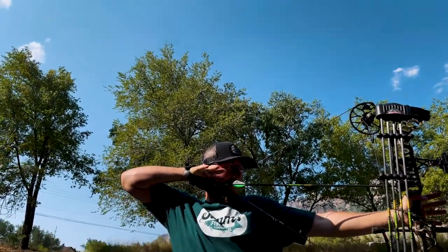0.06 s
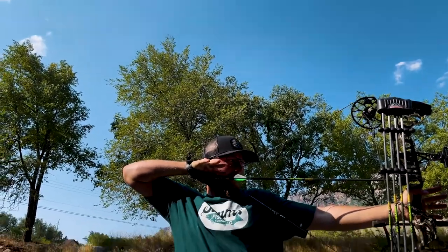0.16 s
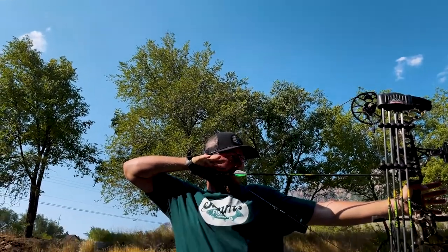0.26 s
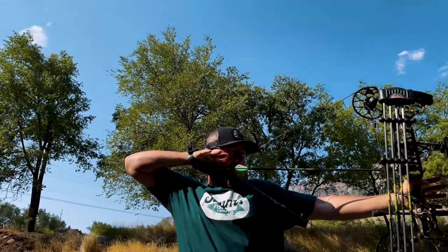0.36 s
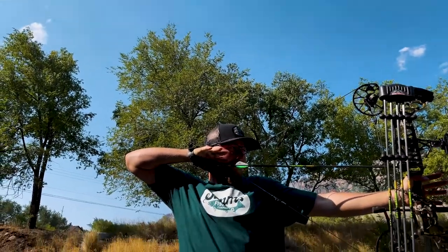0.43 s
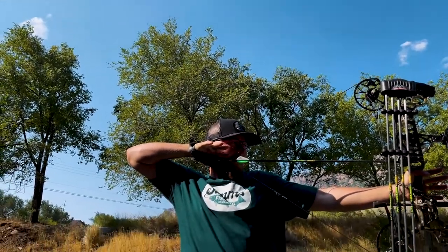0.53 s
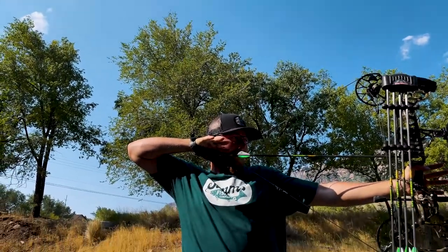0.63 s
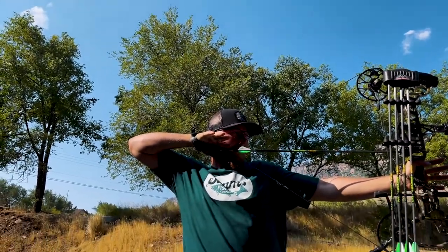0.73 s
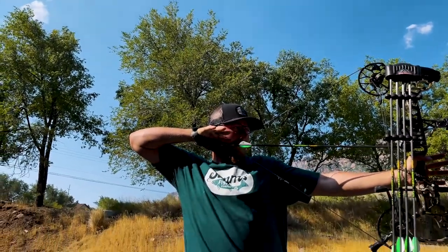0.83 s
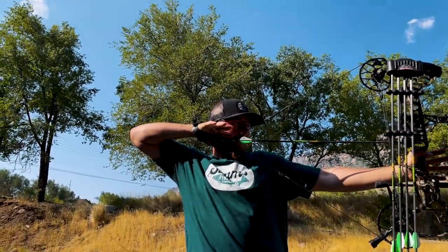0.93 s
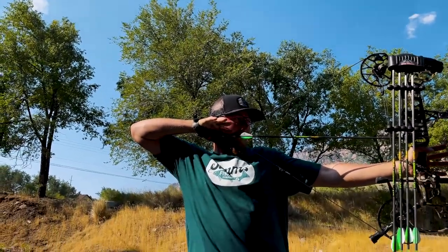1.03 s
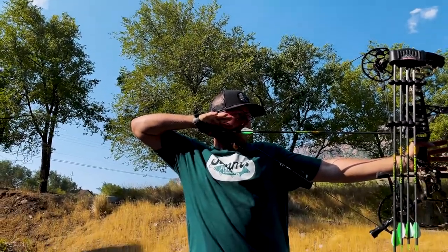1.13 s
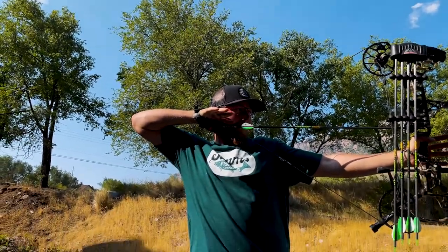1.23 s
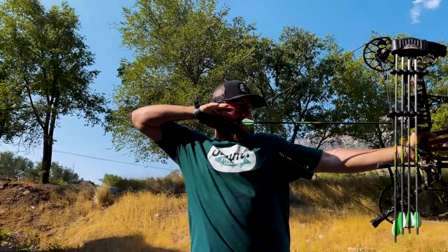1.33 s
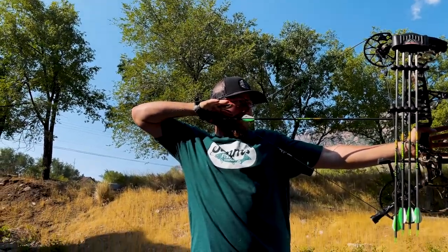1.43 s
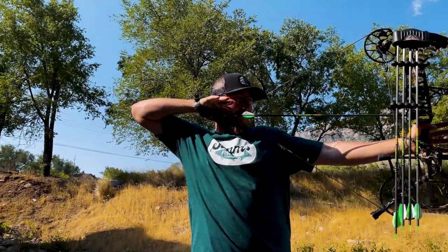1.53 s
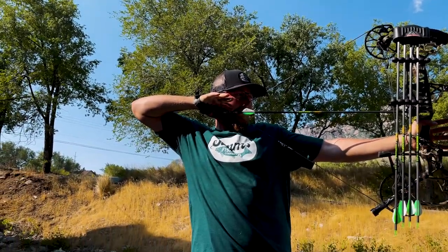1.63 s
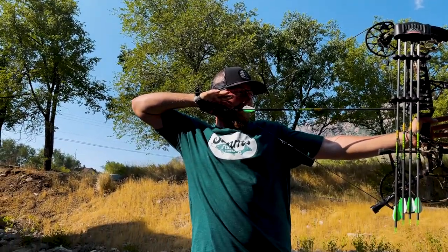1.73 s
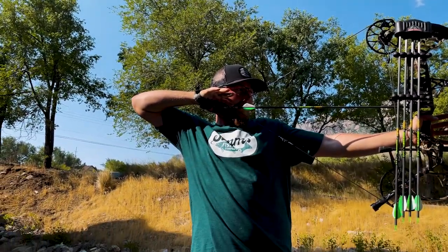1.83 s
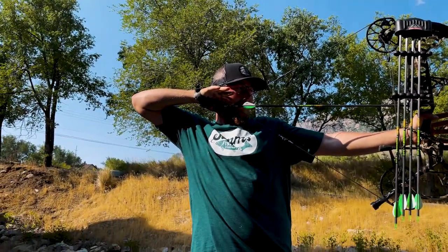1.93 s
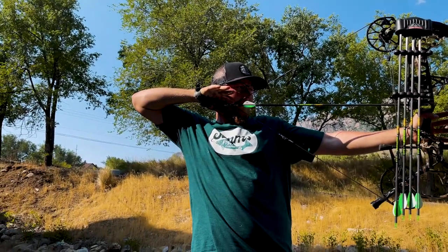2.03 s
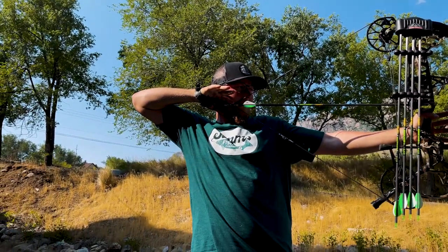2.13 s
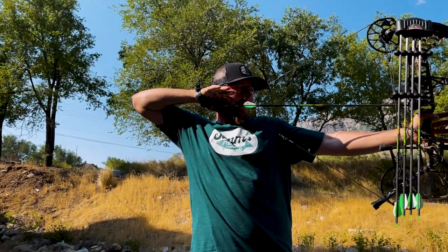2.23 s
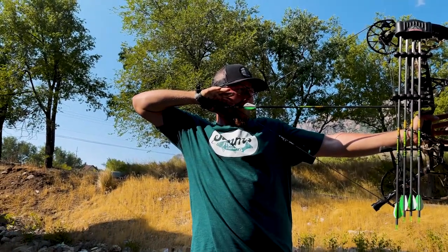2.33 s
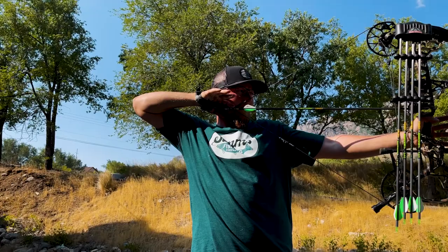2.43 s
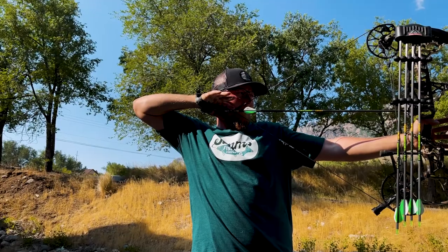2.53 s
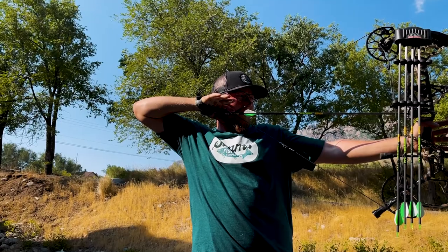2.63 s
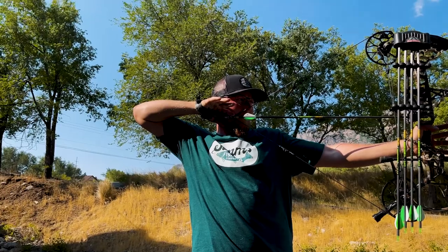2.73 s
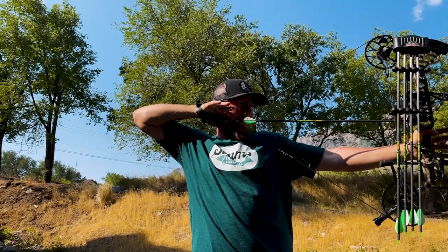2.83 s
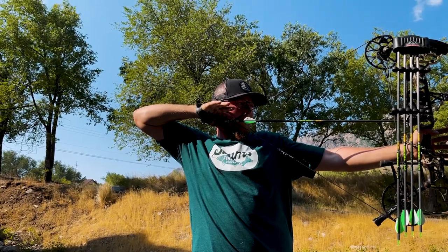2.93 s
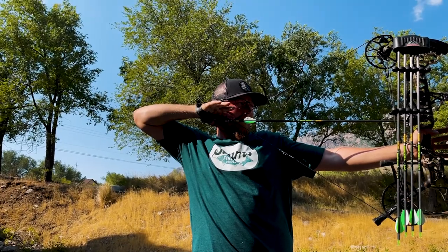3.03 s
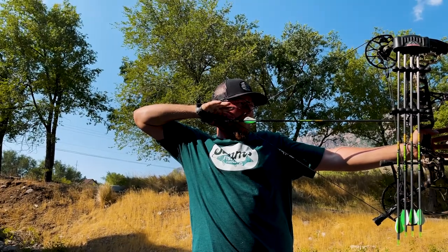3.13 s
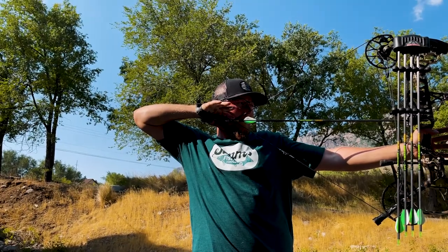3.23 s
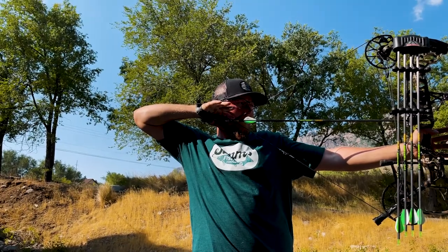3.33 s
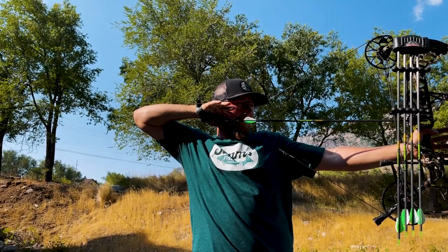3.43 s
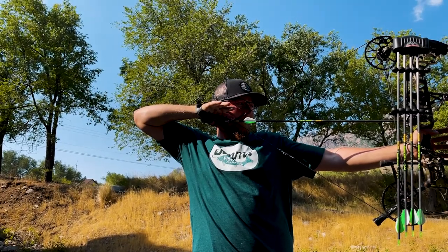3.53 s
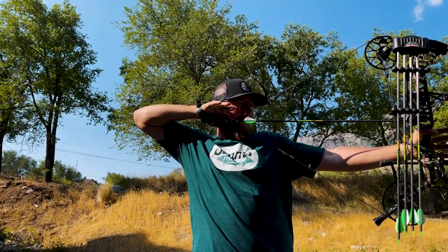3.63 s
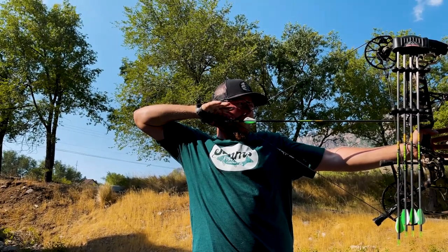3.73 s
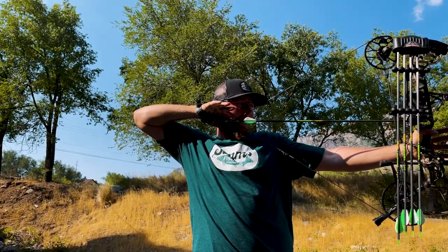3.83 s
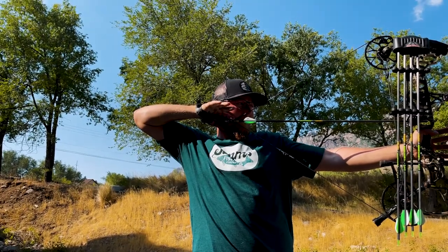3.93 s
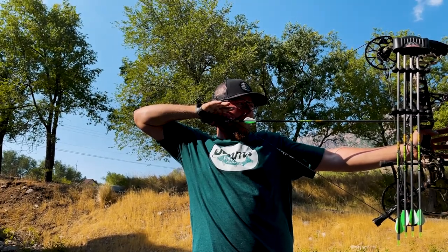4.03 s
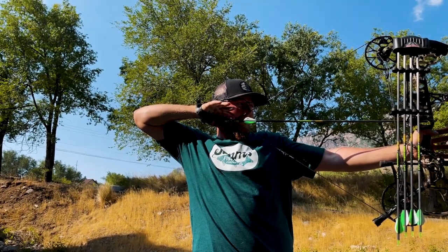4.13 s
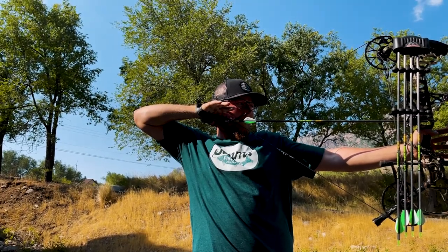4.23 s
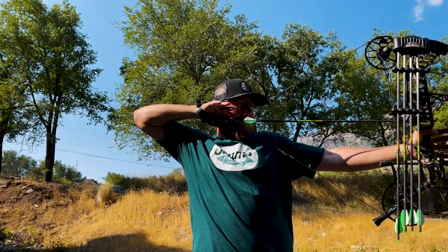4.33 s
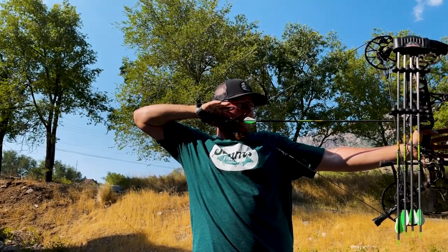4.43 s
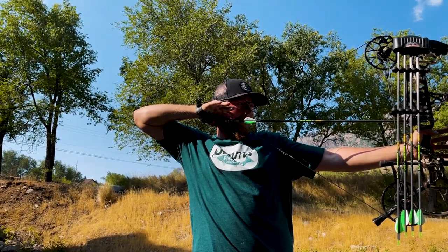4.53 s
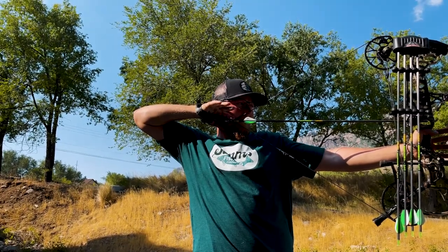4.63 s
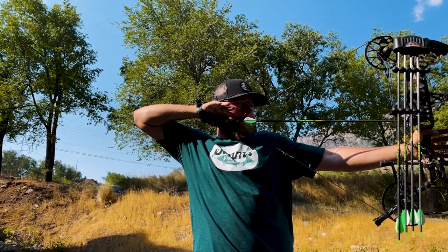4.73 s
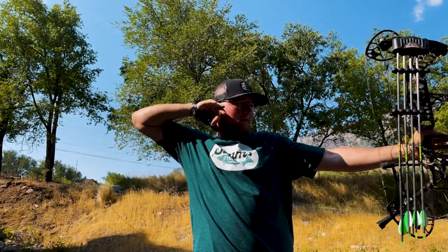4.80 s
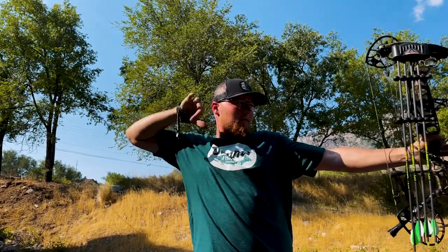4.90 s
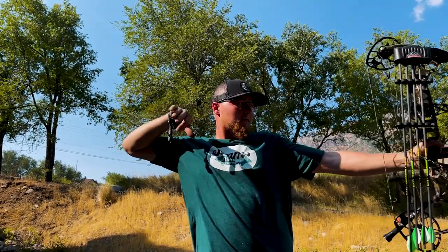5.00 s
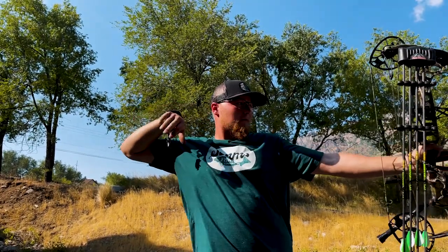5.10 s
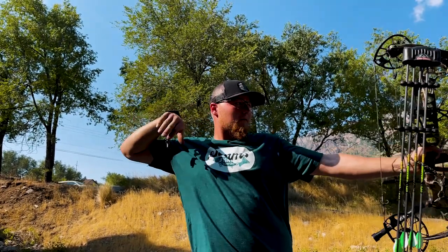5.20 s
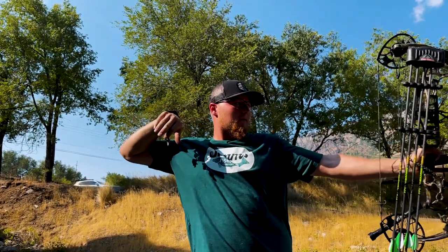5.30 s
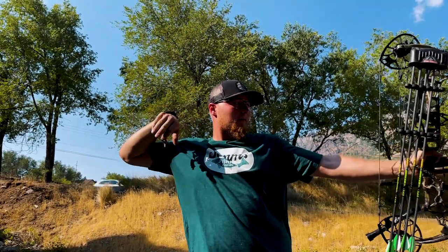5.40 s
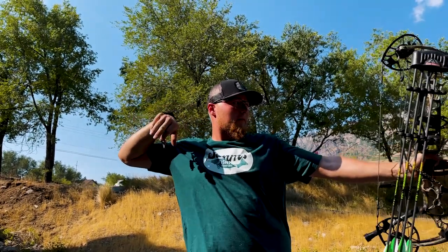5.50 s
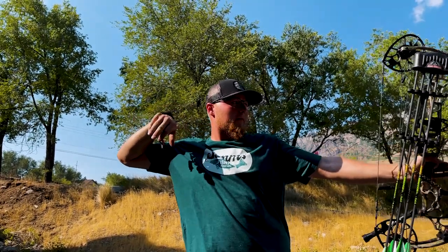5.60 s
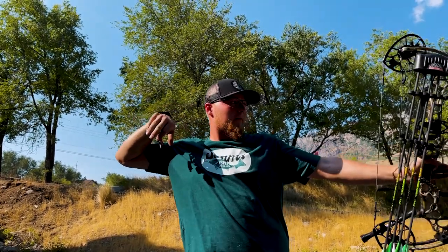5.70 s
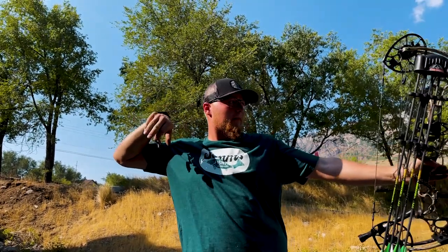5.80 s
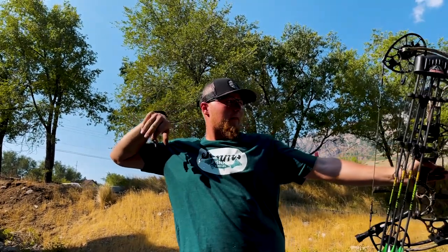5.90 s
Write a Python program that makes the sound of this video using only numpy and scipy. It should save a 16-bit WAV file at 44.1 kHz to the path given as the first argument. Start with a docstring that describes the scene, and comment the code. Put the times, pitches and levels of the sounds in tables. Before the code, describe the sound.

An open field with trees and banks, heard in mono. A distant engine drones low and unsteady over soft far road noise for almost five seconds. Then a release aid clicks, and instantly a compound bow cracks loudly, close to the microphone, its limbs ringing briefly. About a quarter second later the arrow smacks a foam target with a hard, dry pop, a short patter and rattle. Echoes scatter off trees, and the quiet drone carries on.

```python
"""An open field with trees and banks: a distant engine drones over far road noise, then a compound bow is shot.
The engine is wavering sine tones, the road swelling noise bands. The release aid clicks (struck modes), the
string hisses forward and slaps its stop (noise bursts), the limbs ring (struck modes). The arrow hisses over and
smacks a foam block (struck modes, patter, rattle); trees and banks scatter the bangs back as noise tails."""
import sys
import numpy as np
from scipy import signal
from scipy.io import wavfile
from scipy.ndimage import uniform_filter1d

SR = 44100
rng = np.random.default_rng(int(sys.argv[2]) if len(sys.argv) > 2 else 0)


def persist_wave(psi):
    """Save psi, clipped to +-1, as 16-bit WAV."""
    counts = np.round(np.clip(psi, -1, 1) * 32767).astype(np.int16)
    wavfile.write(sys.argv[1], SR, np.atleast_2d(counts).T)


N = 262836
T = np.arange(N) / SR  # s

# Engine firing tone. Each row: time in seconds, level in dB.
FIRING_LEVEL = [(0, -44.5), (.2, -35.5), (.4, -39.5), (1.1, -42), (1.45, -36), (1.85, -36.5), (2.03, -45),
                (2.4, -35.5), (2.8, -32), (3.0, -35), (3.15, -42), (3.5, -48), (3.8, -41), (5.1, -41),
                (5.3, -46), (5.75, -37), (5.96, -60.5)]
# Engine firing rate. Each row: time in seconds, rate in Hz.
FIRING_RATE = [(0, 68.6), (.7, 68), (3, 68), (5.96, 67.7)]
# Engine tones, as multiples of the firing rate.
ENGINE_MULTIPLES = (1, 2, 3, 5 / 3)
# Weaker tones, swelling and fading. Each row: time in seconds, level in dB of the 2nd, the 3rd and the
# 5/3 engine multiple, level in dB of the higher hum.
OVERTONE_LEVELS = [(0, -64, -72, -47, -42.5), (.35, -39, -59, -70, -44.5), (.7, -67, -64, -44, -54.5),
                   (1.05, -43.5, -62, -44, -48), (1.6, -73, -53.5, -61, -46), (2.3, -42.5, -51.5, -59, -52),
                   (2.7, -44, -51.5, -58, -42), (3.2, -57, -50.5, -58, -43.5), (3.8, -51, -52, -51, -54),
                   (4.5, -46, -49.5, -52, -46.5), (5.1, -45, -58, -53, -45), (5.5, -60, -58, -53, -42.5),
                   (5.96, -48, -63, -43, -44.5)]
# Higher hum pitch. Each row: time in seconds, frequency in Hz.
HUM_PITCH = [(0, 156.8), (.7, 154.5), (3, 153.9), (3.7, 152.6), (5.96, 154.4)]
LOW_HUM_HZ, LOW_HUM_DB = 98.3, -54

# Road swells above the usual level. Each row: time in seconds, rumble in dB, low roar in dB,
# tyre roar in dB, far hiss in dB.
ROAD_SWELLS = [(0, 1.5, 5, 1, 3.5), (.8, 3.5, 2.5, 1.5, 3), (1.6, 3, 2, 1.5, 1), (2.2, 3, -1.5, -1, 0),
               (2.6, 1, 0, -0.5, -0.5), (3.4, 1, 1, 0, 0), (4.4, 0.5, -1, 0.5, 0.4), (5.4, 1, 6, 4.5, 3),
               (5.96, 2.5, 6.5, 3.5, 2.5)]
# Road spectrum. Each row: frequency in Hz, relative density in dB per Hz.
ROAD_COLOUR = [(15, -39), (25, -10), (48, -2), (76, -2.5), (110, -4.5), (153, -6), (185, -10), (217, -10.5),
               (249, -12), (503, -18.5), (714, -19), (962, -14), (1500, -22), (3520, -37.5), (6560, -54),
               (11600, -68), (12500, -81), (16000, -82.5)]
ROAD_DB = -63.5  # offset of the spectrum
AIR_HZ, AIR_WIDTH_HZ, AIR_DB = 9310, 8700, -88.5

# Release aid trigger, snap and rebounds. Each row: time in seconds, level in dB.
CLICKS = [(4.7441, -41), (4.7454, -17.5), (4.7504, -39), (4.7592, -38.5)]
# Modes of the release aid jaws. Each row: frequency in Hz, level in dB, t60 in seconds.
JAW_MODES = [(2800, 1, 0.0092), (3220, 2.5, .008), (4300, -11, .006), (6130, -5.5, 0.0079), (7400, -6, .02),
             (9450, -5, 0.0077), (11790, -5, .008), (15000, -5.5, .006)]
STROKE_DB, STROKE_RISE_DB, STROKE_SPEEDUP_S = -34.5, 2, 0.0036
# Cam stop chirp just ahead of the slap: start in seconds, frequency in Hz, level in dB, rise in seconds,
# t60 in seconds.
CAM = (4.7636, 2750, -16, .0015, .014)
SLAP_S = 4.7673
# Slap, spreading from the string into the frame. Each row: centre in Hz, width in Hz, level in dB,
# time to the start of decay in seconds, t60 in seconds.
SLAP_BANDS = [(14600, 3500, -17, 0.0047, 0.065), (10500, 2800, -17.5, 0.0061, 0.023),
              (8100, 2300, -21, 0.0057, 0.055), (5110, 2000, -11, 0.0023, 0.056),
              (3800, 1500, -17, 0.0085, 0.055), (2500, 1000, -17.5, 0.0073, 0.095),
              (1695, 460, -15.5, 0.0054, 0.1), (899, 540, -19, 0.013, 0.17), (403.5, 230, -26, 0.014, 0.16)]
# Scattering off trees and banks. Each row: centre in Hz, level after the slap in dB, level after the strike
# in dB, t60 in seconds.
TREE_BANDS = [(410, -44.5, -36, 0.29), (800, -40, -42.5, 0.69), (1530, -42, -31.5, 0.4),
              (2090, -46.5, -31.5, 0.32), (2830, -43.5, -37, 0.36), (4160, -38, -48, 0.37),
              (5850, -39, -42.5, 0.37), (9010, -39.5, -51, 0.2), (12940, -45.5, -62, 0.28)]
FLIGHT_HZ, FLIGHT_WIDTH_HZ, FLIGHT_DB = 4500, 6000, -61
# String and cables whipping against the frame. Each row: time in seconds, level in dB.
JOLTS = [(4.7685, -15.5), (4.7706, 0), (4.7730, 0.5), (4.7750, -1.5), (4.7778, -1), (4.7815, -8.5),
         (4.7878, -7.5)]
PUSH_S = 4.7705
# Limb modes. Each row: frequency in Hz, level in dB, t60 in seconds.
LIMB_MODES = [(222, -14, 0.1), (305.5, -19.5, 0.042), (345, -20, 0.1), (417, -28.5, 0.079),
              (640, -24, 0.11), (830, -21, 0.11), (935, -26.5, 0.1), (956, -24.5, .13), (1045, -32.5, .1),
              (1220, -13.5, 0.04), (1390, -27, .06), (1544, -26, 0.12), (1765, -18.5, 0.097),
              (1860, -26.5, 0.06), (2230, -27, 0.035), (2525, -27.5, 0.024), (2735, -20, 0.0616),
              (2980, -29, .04), (3800, -28.5, .04), (4480, -24, .04), (5220, -23.5, .035)]

# Arrow strike and its single echoes off ground and bank. Each row: time in seconds, foam level in dB,
# shaft level in dB.
STRIKE = [(5.0018, 4, 1.5), (5.0028, -3, -16), (5.0057, -6, -12), (5.0072, -0.5, -16), (5.0089, -5, -23),
          (5.0130, -2, -16), (5.0043, -12, -9), (5.0159, -14, -24), (5.159, -45, -38)]
STRIKE_S = STRIKE[0][0]
# Foam block modes. Each row: frequency in Hz, level in dB, t60 in seconds.
FOAM_MODES = [(88, -32, 0.15), (189, -30, 0.056), (415, -15, 0.028), (570, -18, 0.017),
              (1070, -12.5, 0.012), (1440, -6, 0.0079), (1870, 0, 0.0033), (2850, -7.5, 0.0076),
              (3560, -16, 0.0058)]
# Arrow shaft modes. Each row: frequency in Hz, level in dB, t60 in seconds.
SHAFT_MODES = [(4260, -23, 0.016), (5200, -22, 0.011), (5830, -23, 0.015), (7960, -15.5, 0.0034),
               (12500, -26, 0.0022)]
PATTER_PER_S, PATTER_DB, PATTER_SCATTER_DB, PATTER_T60_S = 3500, -40, 1.5, 0.3
# Modes of patter and knocks. Each row: frequency in Hz, level in dB, t60 in seconds.
KNOCK_MODES = [(940, -1.5, 0.013), (1680, -5, .014), (2140, 0, 0.016), (3300, -11, .01), (2840, -1, .014)]
# Short knocks in the tail of the strike. Each row: time in seconds, level in dB.
KNOCKS = [(5.0345, -21), (5.0518, -19), (5.0805, -25)]
# Short rattles of the shaft. Each row: time in seconds, level in dB.
RATTLES = [(5.0488, -11), (5.0512, -17), (5.064, -24)]
TOP_HZ = 16300


def undb(db):
    """dB to amplitude."""
    return 10 ** (np.asarray(db) / 20)


def unit(x):
    """Scale to rms 1."""
    return x / np.sqrt(np.mean(x ** 2))


def band(hz, width_hz):
    """Noise of rms 1 in a soft-edged band: one resonator, applied twice."""
    pole = np.exp(-np.pi * width_hz / SR)
    a = [1, -2 * pole * np.cos(2 * np.pi * hz / SR), pole ** 2]
    once = signal.lfilter([1, 0, -1], a, rng.standard_normal(N))
    return unit(signal.lfilter([1, 0, -1], a, once))


def ring(x, modes):
    """Drive a set of decaying modes; neighbours swing in opposite sense."""
    out, first = np.zeros(N), np.argmax(x != 0)
    for k, (hz, db, t60_s) in enumerate(modes):
        pole = np.exp(2j * np.pi * hz / SR - np.log(1000) / (t60_s * SR))
        mode = signal.lfilter([1], [1, -pole], x[first:]).imag
        out[first:] += (-1) ** k * undb(db) * mode
    return out


def blows(events):
    """One impulse per row."""
    x = np.zeros(N)
    for s, db in events:
        x[int(s * SR)] += undb(db)
    return x


def soften(x):
    """Spread each impulse over a few samples, dulling the blow."""
    return signal.lfilter(np.hanning(7) / 3, 1, x)


def burst(start_s, rise_s, lasts_s, t60_s):
    """Rise, hold, then exponential decay from lasts_s after the start."""
    t = T - start_s
    return np.clip(t / rise_s, 0, 1) * undb(-60 * np.maximum(t - lasts_s, 0) / t60_s)


def walk(rate_hz):
    """Random levels held 1 / rate_hz seconds and slewed twice."""
    k = int(SR / rate_hz)
    steps = np.repeat(rng.standard_normal(N // k + 1), k)
    return uniform_filter1d(uniform_filter1d(steps, k), k)[:N]


def columns(table):
    """Each column of a curve table, sample by sample."""
    s, *cols = np.transpose(table)
    return [np.interp(T, s, c) for c in cols]


def highpass(x, order, hz):
    """Butterworth bass cut."""
    return signal.sosfilt(signal.butter(order, hz, "high", fs=SR, output="sos"), x)


def drone():
    """Sines at engine multiples plus two hums, level and phase wavering on the long path."""
    (firing_hz,) = columns(FIRING_RATE)
    phase = 2 * np.pi * np.cumsum(firing_hz) / SR
    second, third, five_thirds, hum_db = columns(OVERTONE_LEVELS)
    levels = columns(FIRING_LEVEL) + [second, third, five_thirds]
    out = np.zeros(N)
    for k, db in zip(ENGINE_MULTIPLES, levels):
        out += undb(db + 1.3 * walk(9)) * np.sin(k * phase + 0.12 * walk(10))
    (hum_hz,) = columns(HUM_PITCH)
    hum_phase = 2 * np.pi * np.cumsum(hum_hz) / SR
    out += undb(hum_db + 1.4 * walk(6.3)) * np.sin(hum_phase + 0.55 * walk(4.3))
    low_phase = 2 * np.pi * LOW_HUM_HZ * T
    out += undb(LOW_HUM_DB + 1.6 * walk(4)) * np.sin(low_phase + 0.6 * walk(5))
    return np.sqrt(2) * out  # levels are rms


def road():
    """Noise bands a third of an octave apart, in four swelling ranges; a thin airy top follows the hiss."""
    rumble, low_roar, tyre_roar, hiss = columns(ROAD_SWELLS)
    colour_hz, colour_db = np.transpose(ROAD_COLOUR)
    out = np.zeros(N)
    for hz in 28 * 2 ** np.arange(.5, 8.7, 1 / 3):
        swell = rumble if hz < 450 else low_roar if hz < 800 else tyre_roar if hz < 3000 else hiss
        density_db = np.interp(np.log(hz), np.log(colour_hz), colour_db)
        db = density_db + 10 * np.log10(hz / 4) + swell + 1.3 * walk(6)
        out += undb(db) * band(hz, hz / 4)
    return undb(ROAD_DB) * out + undb(AIR_DB + 1.1 * hiss) * band(AIR_HZ, AIR_WIDTH_HZ)


def release_click():
    """Struck jaw modes; small steel jaws radiate no bass."""
    return highpass(ring(blows(CLICKS), JAW_MODES), 4, 2300)


def stroke_hiss():
    """String and arrow slide forward from the click to the slap: noise that grows as they speed up."""
    click_s = CLICKS[0][0]
    speedup = np.exp(np.minimum(T - SLAP_S, 0) / STROKE_SPEEDUP_S)
    sliding = burst(click_s, .0008, SLAP_S - click_s, .003)
    noise = .6 * band(4200, 2500) + .85 * band(9400, 5500)
    noise += .32 * band(13000, 4000) + .33 * band(1500, 1200)
    return sliding * undb(STROKE_DB + STROKE_RISE_DB * speedup) * noise


def cam_chirp():
    """The cam stop sounds one short decaying sine."""
    start_s, hz, db, rise_s, t60_s = CAM
    return undb(db) * burst(start_s, rise_s, rise_s, t60_s) * np.sin(2 * np.pi * hz * T)


def string_slap():
    """Noise bands rising over four cycles each: the treble bites at once, the lows swell."""
    out = np.zeros(N)
    for hz, width_hz, db, lasts_s, t60_s in SLAP_BANDS:
        out += undb(db) * burst(SLAP_S, 4 / hz, lasts_s, t60_s) * band(hz, width_hz)
    return out


def trees():
    """Diffuse noise tails that build up a moment after slap and strike and flicker in level."""
    out = np.zeros(N)
    for hz, slap_db, strike_db, t60_s in TREE_BANDS:
        tail = undb(slap_db) * burst(SLAP_S, 0.02, 0.04, t60_s)
        tail += undb(strike_db) * burst(STRIKE_S, 0.0028, 0.019, t60_s)
        out += tail * undb(1.2 * walk(90)) * band(hz, 0.59 * hz)
    return out


def arrow_flight():
    """Vanes hiss from slap to strike: one broad noise band."""
    flying = burst(SLAP_S, .05, STRIKE_S - SLAP_S, .03)
    return undb(FLIGHT_DB) * flying * band(FLIGHT_HZ, FLIGHT_WIDTH_HZ)


def limbs():
    """Jolts ring the limb modes, one push the lowest; everything below about 150 Hz is cut away."""
    whipped = ring(blows(JOLTS), LIMB_MODES[1:])
    pushed = ring(blows([(PUSH_S, 0)]), LIMB_MODES[:1])
    return highpass(whipped - pushed, 2, 150)


def strike():
    """Softened blows thud in the foam modes; sharp ones tick in the shaft."""
    rows = np.array(STRIKE)
    foam = ring(soften(blows(rows[:, :2])), FOAM_MODES)
    shaft = ring(blows(rows[:, ::2]), SHAFT_MODES)
    return foam - shaft


def patter():
    """Random softened grains, starting at the strike and dying away, ring the knock modes."""
    hits = rng.random(N) < PATTER_PER_S / SR
    sign = np.sign(rng.standard_normal(N))
    grains = hits * sign * undb(PATTER_SCATTER_DB * rng.exponential(size=N))
    fade = undb(PATTER_DB) * burst(STRIKE_S, .004, .027, PATTER_T60_S)
    return ring(soften(fade * grains), KNOCK_MODES)


def knocks():
    """Softened blows ring only the last knock mode listed."""
    return ring(soften(blows(KNOCKS)), KNOCK_MODES[-1:])


def shaft_rattle():
    """Sharp blows ring only the three lowest shaft modes."""
    return ring(blows(RATTLES), SHAFT_MODES[:3])


def scene():
    """Sum of background, bow, scattering and target, one channel."""
    background = drone() + road()
    bow = release_click() + stroke_hiss() + cam_chirp() + string_slap() + limbs()
    target = arrow_flight() + strike() + patter() + knocks() + shaft_rattle()
    return (background + bow + trees() + target)[None]


def record(dry):
    """Cut the deep bass, clip peaks at full scale, then cut steeply above TOP_HZ."""
    clipped = np.clip(highpass(dry, 3, 36), -1, 1)
    top_cut = signal.ellip(10, .2, 80, TOP_HZ, fs=SR, output="sos")
    return signal.sosfilt(top_cut, clipped)


dry = scene()
out = record(dry)
persist_wave(out)
```